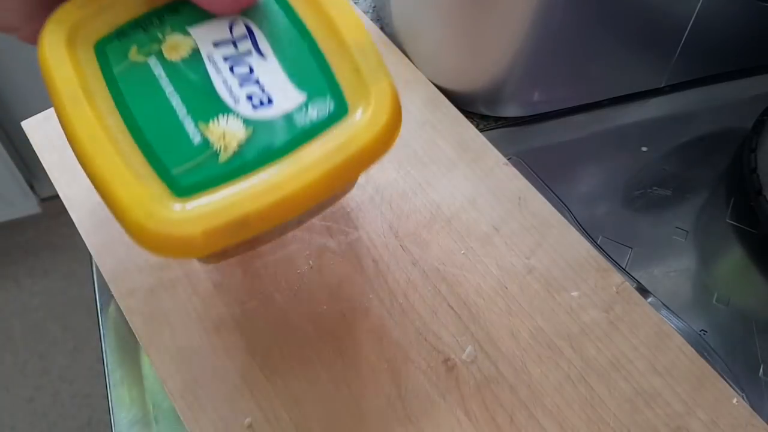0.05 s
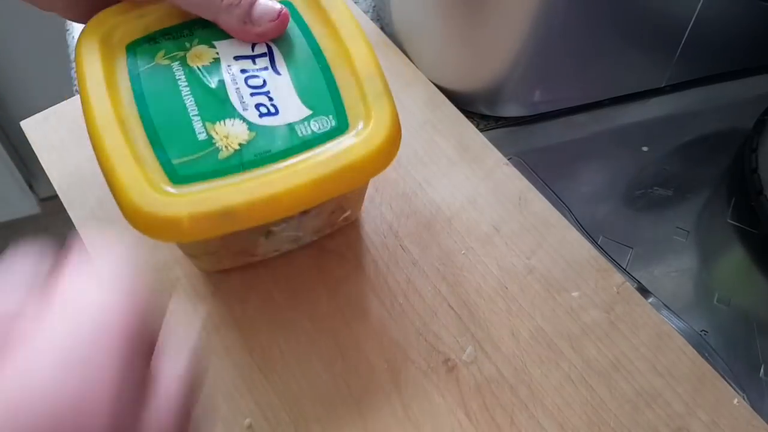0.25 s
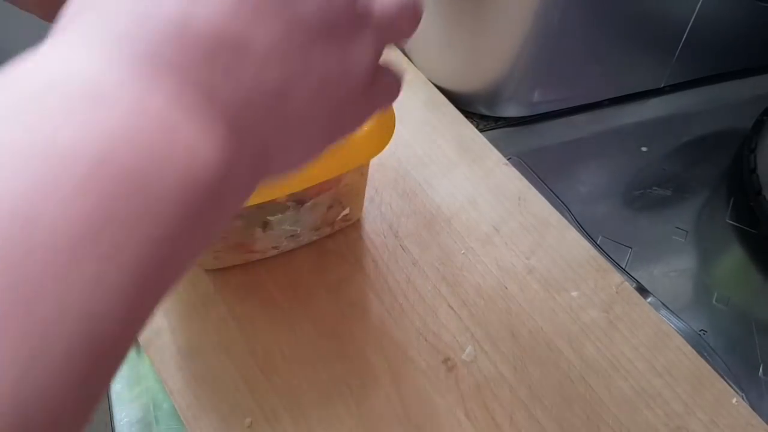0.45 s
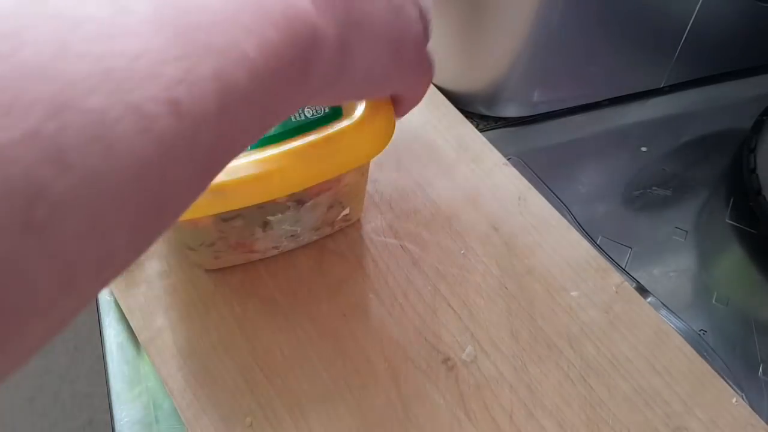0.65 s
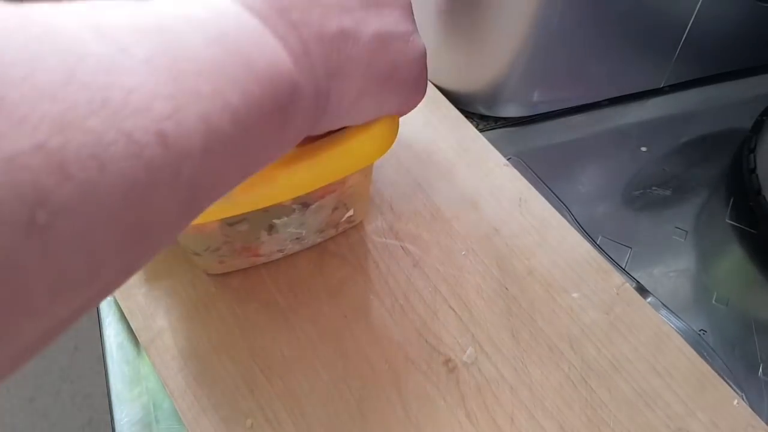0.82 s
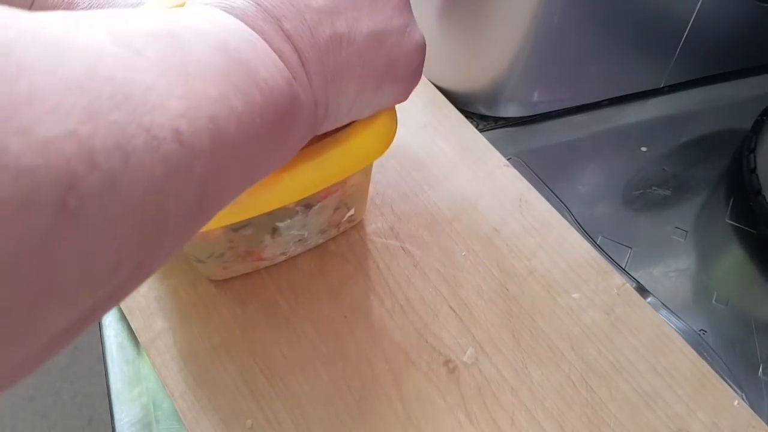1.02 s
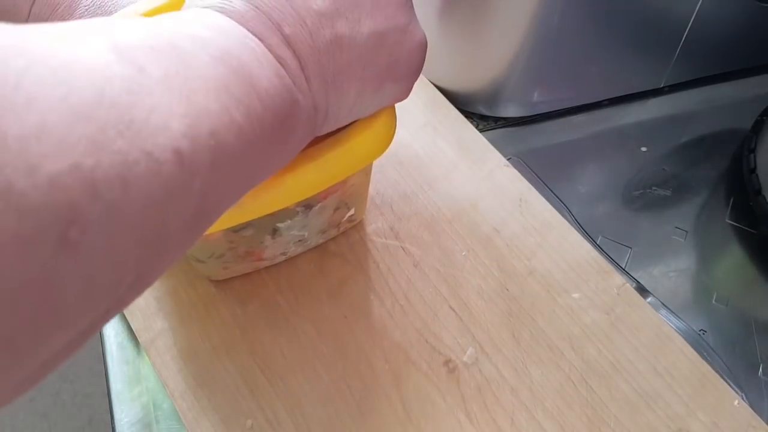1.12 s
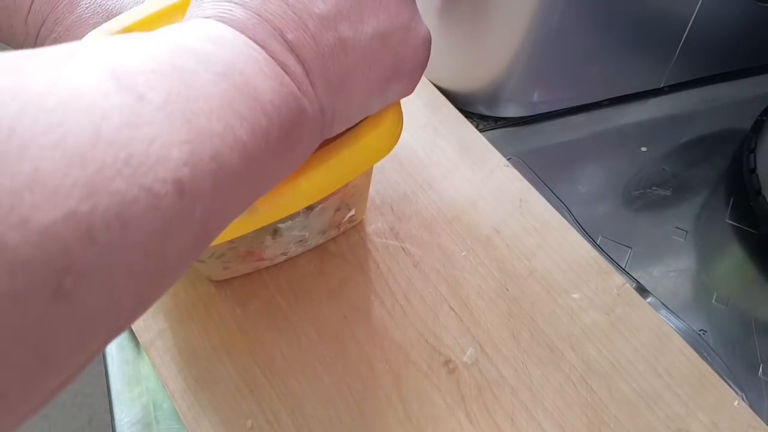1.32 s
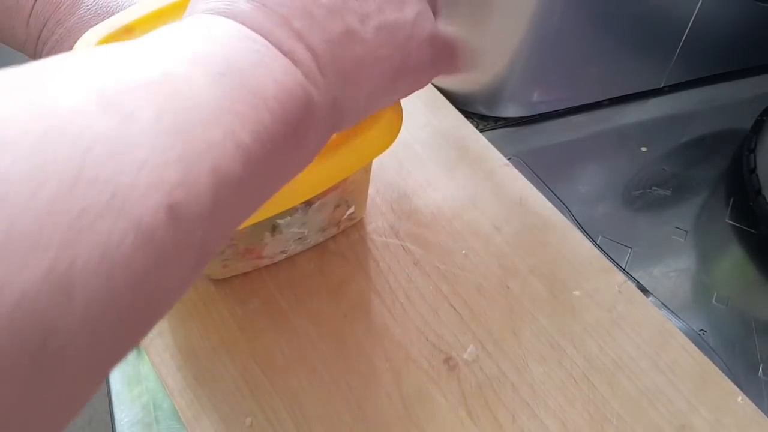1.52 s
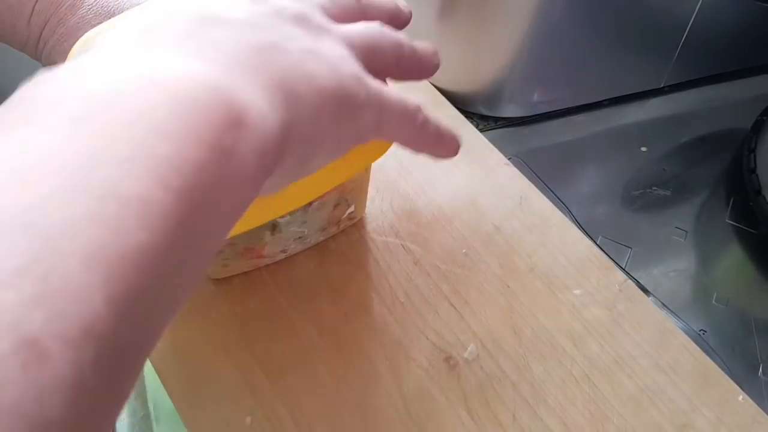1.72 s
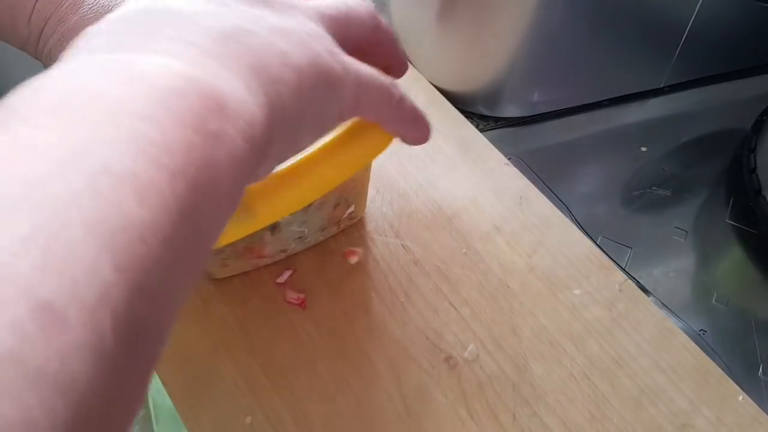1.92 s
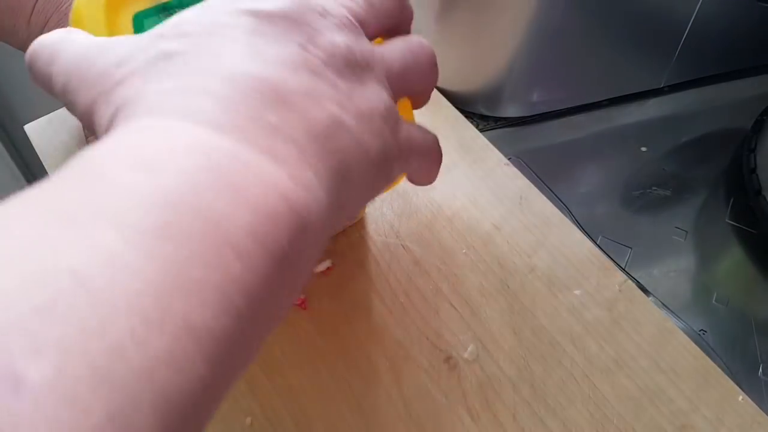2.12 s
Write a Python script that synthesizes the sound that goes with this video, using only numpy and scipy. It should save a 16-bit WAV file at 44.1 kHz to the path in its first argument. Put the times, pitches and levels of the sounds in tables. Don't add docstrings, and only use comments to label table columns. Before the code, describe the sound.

Close stereo microphones in a lively small kitchen: food tumbles in a plastic tub, the tub thuds onto wood, a palm rubs faintly, the pressed lid crackles and clicks shut, then dishes clink further off over low hum.

```python
import sys
import numpy as np
from scipy import signal
from scipy.fft import rfft, irfft
from scipy.io import wavfile
from scipy.ndimage import uniform_filter1d

SR = 44100
rng = np.random.default_rng(int(sys.argv[2]) if len(sys.argv) > 2 else 0)


def pcm_store(signal):
    levels = np.round(np.clip(np.atleast_2d(signal), -1, 1) * 32767)
    wavfile.write(sys.argv[1], SR, levels.astype(np.int16).T)


def rack_gain(trim_db):
    fader = np.asarray(trim_db, float)
    return 10 ** (fader / 20)


N = 94815

# start in seconds, level of the blow in dB, contact time in ms, level of the crack in dB.
KNOCK_BLOWS = [
    (.082, -30.5, 0.039, -34),
    (.2085, -7.5, 0.047, -23.5),
    (.2115, -16.5, 0.21, -22),
    (0.4200, -18.5, 0.53, -27),
    (1.3015, -26, 0.12, -31),
    (.216, -24, 0.15, -31),
    (1.650, -33.5, 0.067, -43),
    (1.653, -30.5, 0.055, -43.5),
    (0.46, -47, 0.065, -63),
]
THUD_BLOWS = [
    (0.083, -51, 0.25, -80),
    (0.211, -20.5, 0.39, -77),
    (0.424, -21.5, 1, -102),
    (1.066, -40, .5, -94),
    (1.112, -30.5, 0.73, -96),
    (1.305, -25, 0.25, -87),
    (1.345, -30.5, 0.29, -85),
    (1.654, -24.5, 1, -96),
    (.445, -35, 1, -87),
    (1.787, -44.5, 0.34, -102),
]
POP_BLOWS = [(0.399, -38, 0.22, -82), (1.087, -29, 1, -61), (1.103, -33, 0.25, -55),
             (1.1075, -25, 0.59, -52), (1.1235, -18, 0.25, -28), (1.128, -22.5, .2, -27),
             (1.143, -34.5, 0.42, -52), (1.166, -32, 0.31, -58), (1.267, -34.5, 1, -46),
             (1.283, -34.5, 0.32, -64), (1.423, -43.5, 0.55, -80), (1.445, -42, 0.37, -86),
             (1.463, -38.5, 0.49, -84), (1.613, -26, 0.26, -44), (1.622, -35.5, 0.32, -60),
             (1.638, -37, 0.36, -54), (1.786, -44, 0.067, -52), (1.806, -38.5, 0.14, -67),
             (1.826, -41, .2, -66), (1.85, -42, 0.073, -70), (1.88, -46.5, 0.18, -80),
             (1.92, -43, 0.4, -82), (2.01, -35.5, 0.1, -55), (1.071, -37.5, 0.51, -58)]
SNAP_BLOWS = [
    (0.744, -81, .04, -56),
    (1.0715, -25, 0.023, -26.5),
    (1.098, -48, 0.033, -39),
    (1.106, -33.5, 0.037, -28),
    (1.1245, -30.5, 0.066, -28),
    (1.127, -26.5, 0.073, -25.5),
    (1.133, -51, 0.092, -31),
    (1.267, -49, 0.055, -45),
    (1.631, -38, 0.12, -48.5),
]
DISH_BLOWS = [
    (1.957, -45.5, 0.35, -60),
    (1.9816, -24, 0.017, -28.5),
    (1.9835, -21, .03, -41),
    (1.995, -18.5, 0.024, -26),
    (2.056, -29, 0.088, -47),
    (2.098, -42, 0.4, -70),
    (2.147, -41, 0.098, -64),
]
TUMBLE_BLOWS = [(.0, -36.5, 0.13, -47), (.009, -41, 0.1, -51), (.019, -40, 0.23, -61),
                (.030, -28, 0.45, -52), (.041, -35, 0.22, -54), (.051, -36.5, 0.21, -59),
                (0.059, -41.5, .3, -57), (.063, -38.5, .3, -62), (.075, -32.5, .3, -55),
                (0.08, -34.5, 0.33, -53), (.090, -42, 0.084, -34), (.107, -44, 0.035, -39)]
CATCH_BLOWS = [
    (1.295, -33, 0.044, -42),
    (1.301, -19, 0.019, -17),
    (1.3044, -22.5, 0.38, -32),
    (1.310, -30, 0.033, -37),
    (1.330, -32, 0.15, -42),
]

# frequency in Hz, level in dB, decay time t60 in seconds.
BOARD_MODES = [(233.5, -0.5, 0.06), (288.6, 1.5, 0.059), (377, -5.5, 0.032), (445, -2.5, 0.08),
               (496, 6.5, 0.032), (595, 4, 0.036), (742, -4, 0.03), (855, 2.5, 0.025), (1026, 2, 0.021),
               (1173, 5, 0.014), (1450, 2.5, 0.015), (1760, -5, 0.017), (2160, -9, 0.019),
               (2940, -16.5, 0.015)]
WORKTOP_MODES = [(51.8, -12, 0.21), (80, -9.5, 0.14), (107.6, -6.5, 0.16), (130, -4.5, 0.17),
                 (138.8, 0, 0.18), (162.8, -3, 0.2), (186, -10.5, .08)]
TUB_MODES = [(325.5, -12.5, 0.026), (365, -9.5, 0.033), (467, -7, 0.025), (500, -0.5, 0.047),
             (694, -16.5, 0.017), (563, -1.5, 0.048), (950, -13.5, 0.025), (1300, -9.5, 0.033)]
LID_MODES = [(814, -7.5, 0.032), (1190, -1.5, 0.022), (1470, -1, 0.018), (1955, -5.5, 0.025),
             (2253, 2, 0.025), (2655, -3, .02), (2886, 4, .02), (3290, 10, .02), (3460, 8.5, .02),
             (3560, 8, .02), (3714, 9.5, .015), (5200, 2, .015), (6400, -2, .015), (7100, 3, .015)]
DISH_MODES = [(738, 6, 0.022), (1170, 4.5, 0.04), (1290, 1.5, 0.024), (1550, -2.5, 0.021), (1810, -2, 0.04),
              (2137, 10.5, 0.06), (2360, 5.5, 0.05), (2620, 3.5, 0.04), (3335, 9, .03), (3760, 2, .02),
              (4310, 10.5, .02), (4670, 4.5, .015), (5570, 0, .015), (6300, -3, .015), (6700, -1, .015)]
LIFTED_MODES = [(292, -9.5, 0.012), (374, -2, 0.036), (457, -7, 0.03), (557, -1, 0.019), (770, -7.5, 0.021),
                (964, -3.5, 0.031), (1530, -6, 0.018), (2650, -2, .02)]
SHUT_MODES = [(159, -8, .04), (238, 1, 0.048), (425, 1, 0.036), (566, 0, 0.032), (866, -1, 0.024),
              (1287, -5.5, 0.02), (1428, -1, .03), (1887, -5.5, .025), (2570, -22, .02), (3270, -3, .025),
              (3640, 0.5, .02), (4750, -18, .02), (5660, -16, .015), (6500, -8, .02)]

# board, worktop, tub, lid, crockery, lifted tub, catch.
# Share sent to the room, in dB.
ROOM_SEND_DB = [-6, -8.5, -3.5, -2.5, -5.5, -6.5, -5]
LEFT_OVER_RIGHT_DB = [0.5, 1.5, 2.5, -0.3, -1.5, 4, 1.5]
LEFT_LAG_S = [.00006, .00008, -.00008, .00006, -.00006, -.00006, .00005]
CRACK_TOP_HZ = [5560, 994, 3950, 7400, 7640, 3500, 8700]
CRACK_DECAY_S = [0.013, .014, 0.03, .012, 0.028, 0.045, 0.019]
CRACK_ATTACK_S = [0.00032, .0004, 0.00052, 0.00064, 0.0024, .0006, 0.00048]
RATTLE_LEVEL_DB = [-20, -26, -23, -22.5, -18, -24, -21]

# frequency in Hz, t60 in seconds.
ROOM_DECAY = [(100, 0.33), (300, 0.36), (1000, 0.35), (3000, 0.36), (6000, 0.19), (9000, 0.16),
              (14000, 0.14)]
# frequency in Hz, likeness from 0 to 1.
ROOM_LIKENESS = [(100, 0.796), (400, 0.56), (1500, 0.37), (5000, .05)]
# middle in seconds, length in seconds, level in dB.
RUB_STROKES = [(0.012, 0.062, -65.5), (0.13, 0.079, -91), (0.265, 0.12, -52.5), (0.423, 0.2, -59),
               (0.512, 0.19, -66.5), (0.616, 0.2, -58), (0.785, .12, -61), (0.886, 0.15, -61.5),
               (1.323, 0.074, -49.5), (1.356, 0.36, -61), (1.827, 0.14, -58.5)]
# frequency in Hz, level in dB per Hz.
RUB_SPECTRUM = [(300, -17.5), (1000, -6), (1900, -7), (3000, -7.5), (6000, -12.5), (8600, -11.5),
                (13000, -9.5), (15000, -31)]
# frequency in Hz, level in dB per Hz.
AIR_SPECTRUM = [(20, -32), (60, 4), (140, 3), (240, -13), (560, -14.5), (1900, -29.5), (3300, -31),
                (14000, -37)]
# frequency in Hz, likeness from -1 to 1.
NOISE_LIKENESS = [(60, 1), (400, 0.54), (1500, -0.1), (5000, 0.023)]
# frequency in Hz, level in dB.
MIC_RESPONSE = [(18, -32.5), (75, -0.5), (7500, 7.5), (8500, -7), (9600, -0.5), (12000, 0.5), (14600, -1),
                (16000, -42)]

SPOT_DB, SPOT_DETUNE = 1.5, .012
KIN_DB, KIN_SPREAD = -10, .13
RISE_CYCLES, MOST_CYCLES = .15, 40
CRACK_LIKENESS = 0.46
RATTLE_PER_S, RATTLE_T60 = 1200, .1
RATTLE_WANDER = 0.71


def evened(x):
    return x / np.sqrt(np.mean(x ** 2) + 1e-20)


def read(points, hz):
    f, value = np.transpose(points)
    return np.interp(np.log(hz + 1), np.log(f + 1), value)


def blended(a, b, likeness):
    return likeness * a + np.sqrt(1 - likeness ** 2) * b


def crack_noise(t, top_hz, t60, rise):
    both, *sides = rng.standard_normal((3, len(t)))
    crack = np.sqrt(CRACK_LIKENESS) * both + np.sqrt(1 - CRACK_LIKENESS) * np.array(sides)
    crack = signal.lfilter(*signal.butter(2, top_hz, fs=SR), crack)
    crack = signal.lfilter(*signal.butter(1, top_hz / 6, "highpass", fs=SR), crack)
    return crack * np.minimum(t / rise, 1) * rack_gain(-60 * t / t60)


def rattle_taps(t, level_db):
    sizes, drift = rng.standard_normal((2, len(t)))
    happens = rng.random(len(t)) < RATTLE_PER_S / SR
    taps = happens * sizes * rack_gain(level_db - 60 * t / RATTLE_T60)
    return taps * (1 + RATTLE_WANDER * np.array([[1], [-1]]) * drift)


def struck(blows, modes, crack_hz, crack_t60, crack_rise, rattle_db):
    out = np.zeros((2, N + SR))
    t = np.arange(0, np.max(modes, 0)[2] + RATTLE_T60, 1 / SR)
    hz, db, t60 = np.transpose(list(modes) * 3)[:, :, None]
    order = np.arange(len(hz))[:, None]
    kin = order >= len(modes)
    t60 = np.minimum(t60, MOST_CYCLES / hz)
    for s, blow_db, contact_ms, crack_db in blows:
        spot, tune, side = rng.standard_normal((3, len(hz), 1))
        turns = hz * np.exp(np.where(kin, KIN_SPREAD, SPOT_DETUNE) * tune) * t
        sign = np.where(kin, np.sign(side), (-1.) ** order)
        level = sign * rack_gain(db + KIN_DB * kin + SPOT_DB * spot - 60 * t / t60)
        ring = level * (1 - np.exp(-turns / RISE_CYCLES)) * np.sin(2 * np.pi * turns)
        u = t[:1024] * 1000 / max(contact_ms, .005)
        push = u * np.exp(-u)
        hit = signal.fftconvolve(ring.sum(0), push)[:len(t)]
        one = rack_gain(blow_db) * hit / abs(hit).max()
        one = one + rack_gain(crack_db) * crack_noise(t, crack_hz, crack_t60, crack_rise)
        rattle = signal.fftconvolve(one, rattle_taps(t, rattle_db), axes=1)[:, :len(t)]
        at = max(round(s * SR), 0)
        out[:, at:at + len(t)] += one + rattle
    return out[:, :N]


def noise(colour, patchy_db, size):
    frames, hz = 4 * N // size + 5, np.fft.rfftfreq(size, 1 / SR)
    a, b, c, d, patch = rng.standard_normal((frames, len(hz), 5)).T
    patch = uniform_filter1d(patch, size=10, axis=0)
    patch = evened(uniform_filter1d(patch, size=12, axis=1))
    likeness = np.clip(read(NOISE_LIKENESS, hz), -1, 1)[:, None]
    left = a + 1j * b
    z = np.array([left, blended(left, c + 1j * d, likeness)])
    z = z * rack_gain(read(colour, hz)[:, None] + patchy_db * patch)
    return evened(signal.istft(z, nperseg=size, noverlap=size * 3 // 4)[1][:, :N])


def rub():
    t = np.arange(N) / SR
    flicker = evened(uniform_filter1d(rng.standard_normal(N), size=200))
    level = sum(rack_gain(db) * np.exp(-8 * ((t - s) / length) ** 2) for s, length, db in RUB_STROKES)
    return noise(RUB_SPECTRUM, patchy_db=.8, size=256) * level * rack_gain(1.5 * flicker)


def kitchen():
    taps = np.zeros((2, SR))
    at = np.arange(0, SR - 20, 20) + rng.integers(0, 20, (2, (SR - 1) // 20))
    np.put_along_axis(taps, at, rng.choice([-1., 1.], at.shape), 1)
    hz, t, (a, b) = signal.stft(taps, SR, nperseg=256)
    likeness = np.clip(read(ROOM_LIKENESS, hz), 0, 1)[:, None]
    z = np.array([a, blended(a, b, likeness)]) * rack_gain(-60 * t / read(ROOM_DECAY, hz)[:, None])
    tail = signal.istft(z, SR, nperseg=256)[1]
    gap_s = .004
    tail = np.pad(tail, ((0, 0), (round(gap_s * SR), 0)))
    return tail / np.linalg.norm(tail[0])


def motor_hum():
    centre_hz, width_hz = 143.4, 10.3
    r = np.exp(-np.pi * width_hz / SR)
    turn = np.exp(2j * np.pi * centre_hz * np.arange(N) / SR)
    return evened((turn * signal.lfilter([1], [1, -r], rng.standard_normal(N) / turn)).real)


def air():
    return rack_gain(-53) * noise(AIR_SPECTRUM, patchy_db=-1.5, size=2048) + rack_gain(-58.5) * motor_hum()


def scene():
    mix, send = rub() + air(), np.zeros(N)
    hz = np.fft.rfftfreq(2 * N, 1 / SR)
    ear = np.array([[.5], [-.5]])
    all_blows = [KNOCK_BLOWS, THUD_BLOWS, POP_BLOWS, SNAP_BLOWS, DISH_BLOWS, TUMBLE_BLOWS, CATCH_BLOWS]
    all_modes = [BOARD_MODES, WORKTOP_MODES, TUB_MODES, LID_MODES, DISH_MODES, LIFTED_MODES, SHUT_MODES]
    for blows, modes, send_db, pan_db, lag, *crack in zip(
            all_blows, all_modes, ROOM_SEND_DB, LEFT_OVER_RIGHT_DB, LEFT_LAG_S,
            CRACK_TOP_HZ, CRACK_DECAY_S, CRACK_ATTACK_S, RATTLE_LEVEL_DB):
        x = struck(blows, modes, *crack)
        send += rack_gain(send_db) * x.mean(0)
        placing = rack_gain(pan_db * ear) * np.exp(-2j * np.pi * hz * lag * ear)
        mix += irfft(rfft(x, 2 * N) * placing)[:, :N]
    return mix + signal.fftconvolve(send[None], kitchen(), axes=1)[:, :N]


def low_pass(x):
    return signal.sosfilt(signal.butter(12, 15910, fs=SR, output="sos"), x)


def record(dry):
    hz = np.linspace(0, SR / 2, 257)
    taps = signal.minimum_phase(signal.firwin2(511, hz, rack_gain(2 * read(MIC_RESPONSE, hz)), fs=SR))
    dry = signal.sosfilt(signal.butter(2, 45, "highpass", fs=SR, output="sos"), dry)
    mix = signal.oaconvolve(dry, taps[None], axes=1)[:, :N]
    return low_pass(mix)


dry = scene()
out = record(dry)
pcm_store(out)
```